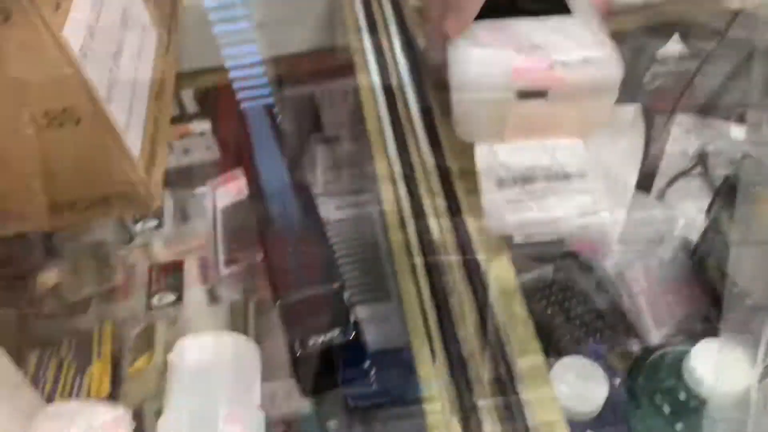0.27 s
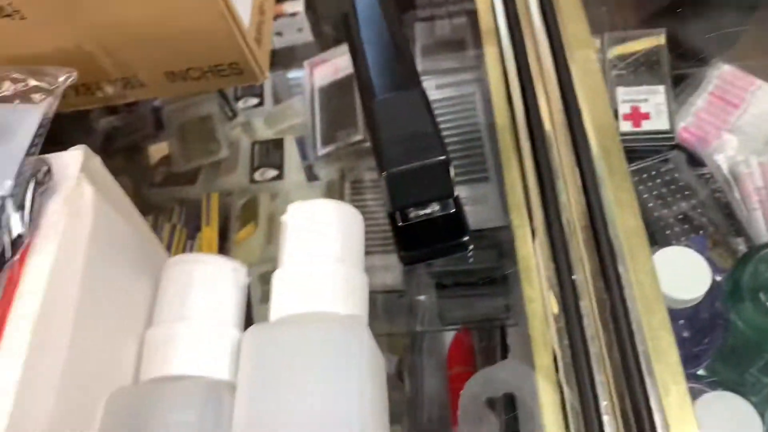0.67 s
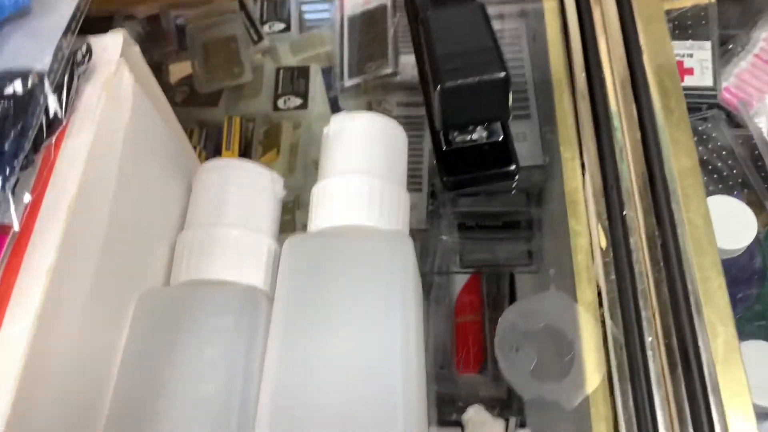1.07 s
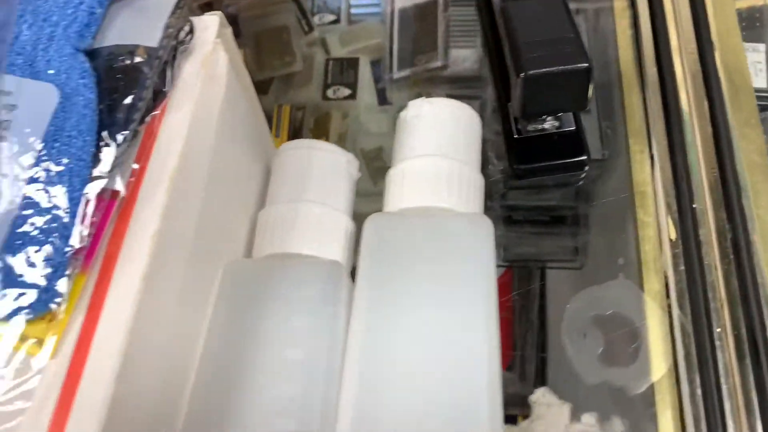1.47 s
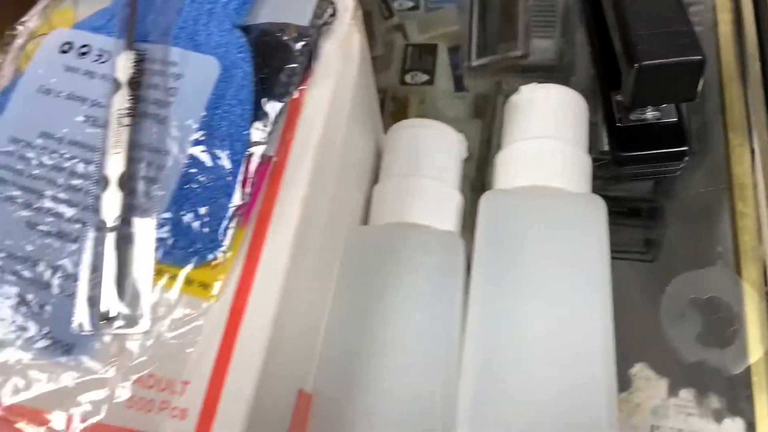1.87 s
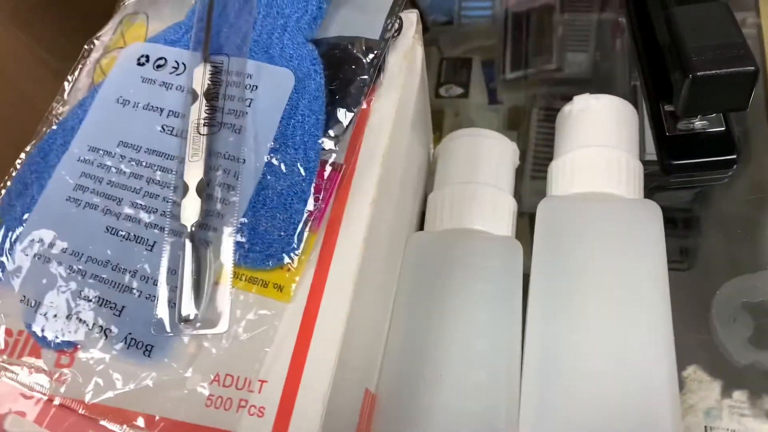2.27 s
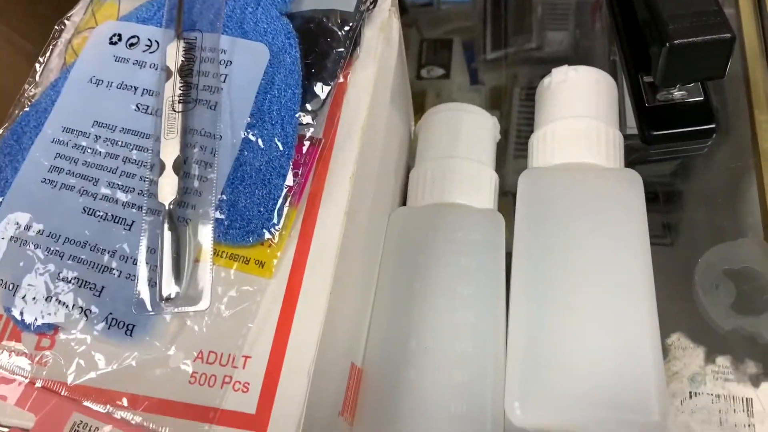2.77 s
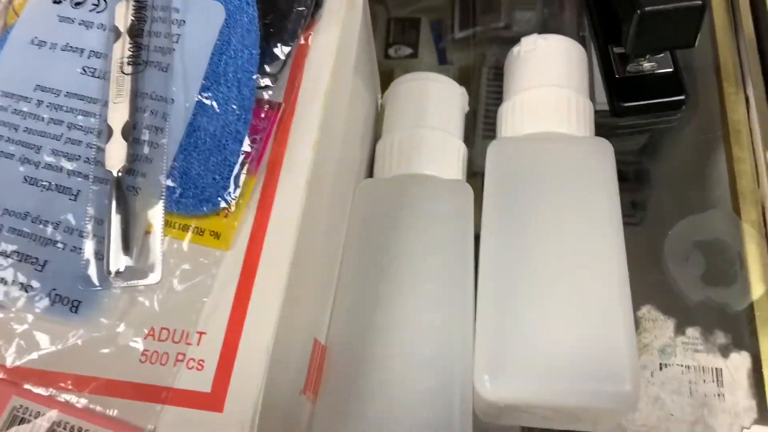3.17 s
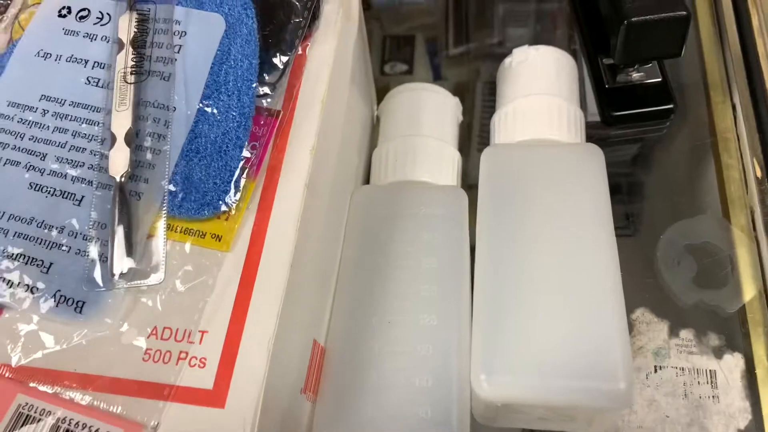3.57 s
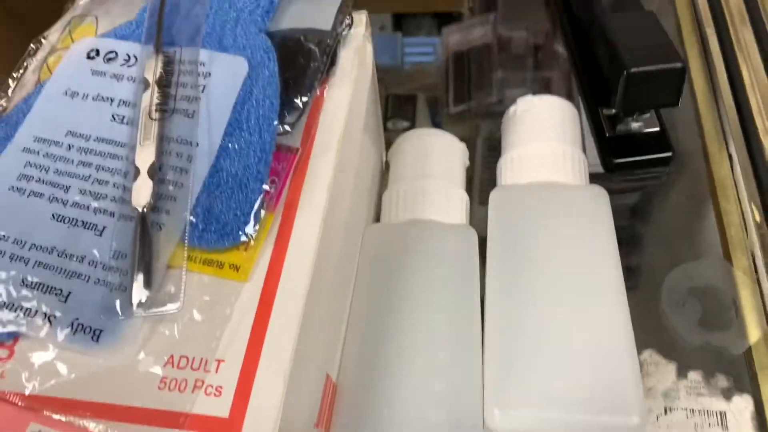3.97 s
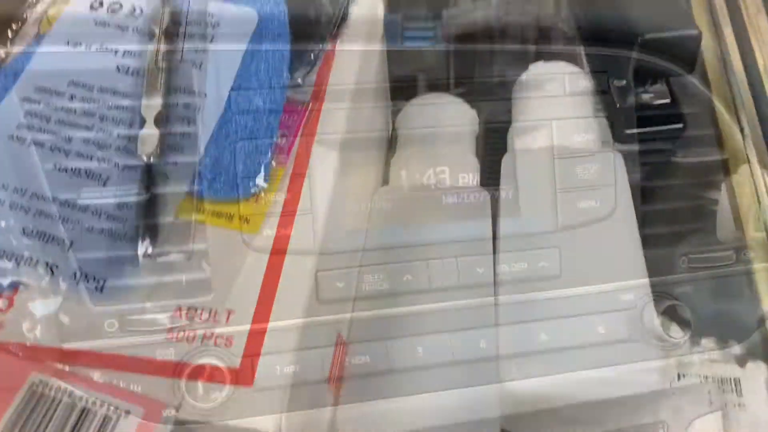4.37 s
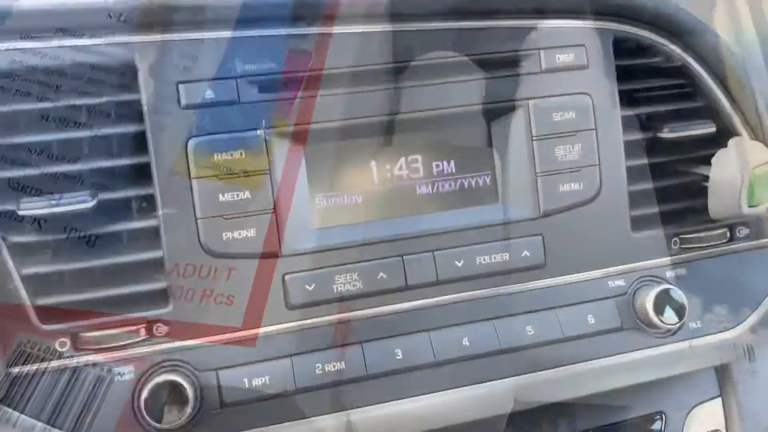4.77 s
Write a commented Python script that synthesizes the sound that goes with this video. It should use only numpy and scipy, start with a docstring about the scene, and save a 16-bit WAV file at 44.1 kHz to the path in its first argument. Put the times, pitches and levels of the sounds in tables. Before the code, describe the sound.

In a small shop with a low fan hum, plastic film crinkles and clicks near the microphone as packages are handled. One quick, squealing tear of tape stands out early on. After a lull with soft box knocks and a brief scrape, more crackling and sharp snaps follow, with a slight room echo. The handling dies down as the deep rumble inside a car comes in.

```python
"""Plastic film rustles, crumples and snaps as hands shift wrapped goods on a shop counter, off to the right.
Each tiny crease that gives way makes a burst of noise. Tape is torn off a carton, slipping faster and faster
in a rising squeal. Boxes knock and scuff, and the shop echoes briefly. A fan hums in the room; a busier
corner of the shop fades out at the start and the rumble of a car cabin fades in at the end."""
import sys
import numpy as np
from scipy import signal
from scipy.fft import rfft, irfft
from scipy.io import wavfile
from scipy.ndimage import uniform_filter1d

SR = 44100
rng = np.random.default_rng(int(sys.argv[2]) if len(sys.argv) > 2 else 0)


def wav_out(sig):
    """Save sig, one row per channel (or a flat mono array), as 16-bit PCM at SR to the path in sys.argv[1]."""
    wavfile.write(sys.argv[1], SR, np.round(np.clip(np.atleast_2d(sig).T, -1, 1) * 32767).astype(np.int16))


N = 220500
LAG_SAMPLES = 8  # sound from the right reaches the left microphone this much later


def film_rustle():
    """Film crackles crisply over a papery rustle and the dull rub of fingers and card."""
    # Each row: time in seconds, rustle level in dB, rubbing level in dB.
    handling = [(0.0, -75, -65.5), (0.2, -66, -52), (0.33, -60, -55.5), (0.48, -65, -60),
                (0.88, -66.5, -58.5), (1.05, -52.5, -53.5), (1.3, -52, -55.5), (1.5, -40, -56),
                (1.56, -58.5, -53), (1.68, -62, -60), (1.93, -65.5, -64.5), (2.11, -74.5, -69.5),
                (2.4, -78, -68), (2.54, -87.5, -86.5), (2.84, -85, -79.5), (2.93, -56, -52),
                (3.03, -53.5, -55.5), (3.22, -56.5, -67), (3.45, -62.5, -62), (3.62, -62, -61.5),
                (3.85, -74.5, -66.5), (3.944, -69.5, -68), (3.965, -60.5, -61.5), (4.02, -69, -61.5),
                (4.1, -77.5, -76.5), (4.25, -80, -80.5), (4.4, -78.5, -71), (4.56, -65, -65),
                (4.88, -72, -68), (5.0, -80, -75.5)]
    # The tone of each of the three layers. Each row: frequency in Hz, level in dB.
    crisp_tone = [(5500, -21), (7500, -5), (9500, 1.5), (12500, -2), (16000, -2.5)]
    papery_tone = [(1800, -14.5), (2800, -2), (4500, -3), (6800, 2), (8500, -13.5)]
    dull_tone = [(300, -1), (600, 1.5), (1200, -5), (2200, -2.5), (3500, -9.5), (6000, -8)]
    film_db, dull_db = curves(handling)
    crisp_db = -65 + 1.34 * (film_db + 65)  # firm handling is brighter
    crisp = rubbing(crisp_tone, alike=1, creases=(360, 1.4, 0.0038), smooth=1.5, flutter_db=2.2)
    papery = rubbing(papery_tone, alike=0.46, creases=(170, 2.1, 0.0048), smooth=1.1, flutter_db=1.1)
    dull = rubbing(dull_tone, alike=0.6, creases=(220, 2.0, 0.006), smooth=1.2, flutter_db=1.8)
    return crisp * undb(crisp_db) + papery * undb(film_db) + dull * undb(dull_db)


def film_crumples():
    """Handfuls of film crumple in bursts of dense crackle that swell and sink."""
    # Each row: middle in seconds, half length in seconds, level in dB, low cutoff in Hz.
    handfuls = [(0.901, 0.054, -45, 5000), (1.09, 0.051, -46, 6000), (1.184, 0.028, -37, 1200),
                (1.33, 0.032, -78, 4970), (1.905, 0.031, -46, 2540), (2.877, 0.022, -51.5, 2500),
                (2.944, 0.045, -37.5, 1940), (3.159, 0.14, -44, 4080), (3.431, 0.064, -45.5, 5270),
                (3.564, 0.02, -42, 1180), (3.957, 0.013, -35, 2200), (3.987, 0.064, -55, 1800),
                (4.629, 0.039, -57, 3006), (4.866, 0.096, -56, 4100)]
    tone = [(300, -3.5), (3000, -6.0), (16000, -4.0)]  # Each row: frequency in Hz, level in dB.
    crackle = rubbing(tone, alike=0.94, creases=(650, 1.7, 0.0031), smooth=0.89, flutter_db=0.99)
    out = np.zeros((2, N))
    for middle, half, db, cutoff_hz in handfuls:
        at = np.arange(int((middle - half) * SR), int((middle + half) * SR))
        swell = undb(db) * np.cos(np.pi / 2 * (at / SR - middle) / half) ** 2
        out[:, at] += swell * filtered(crackle[:, at], cutoff_hz, "high")
    return out


def film_snaps():
    """A crease snaps in a ragged burst; heavier ones fill the lower ranges, which ring longer."""
    # Each row: start in seconds, treble level in dB, weight (middle against treble) in dB,
    # body (bass against treble) in dB, length as a multiple of the usual ring.
    creases = [(0.227, -45, -1, 6, .9), (0.2458, -39, 5.5, 2.5, .8), (0.4, -34, -3.5, -12, 1.1),
               (0.463, -37.5, -2.5, -13, .9), (0.615, -29.5, -6.5, -26, .7), (0.6407, -43, 2, -20, .9),
               (0.6471, -37, 7.5, -1.5, .7), (0.6885, -44, -10, -24, 1.8), (0.7455, -41, -5.5, -21, .9),
               (0.77, -42, -4, -6.5, .9), (0.8659, -32.5, -13, -18, .9), (0.9476, -30, -13, -21, 1.6),
               (0.9924, -39.5, -7, -5, .9), (1.1723, -9.5, -20.5, -22.5, .75), (1.253, -32, -7, -13.5, .9),
               (1.296, -29.5, -22, -13.5, .9), (1.362, -41, -5, -4, .9), (1.3784, -38, -11, -25, .9),
               (1.391, -18.5, -10, -16, .7), (1.8923, -23.5, -14.5, -22, 1.3), (2.192, -58, 15.5, 14.5, .9),
               (2.206, -63, 16, 20, .9), (2.825, -51.5, -9, -17.5, .9), (2.8697, -42, -5, -14.5, .9),
               (2.906, -35, -18, -20, .9), (2.917, -48, -1, -4, .9), (2.9238, -34, -1.5, -17, .9),
               (2.9315, -20, -13.5, -27, 1.7), (2.941, -42, -19, -9, .9), (2.984, -35.5, -6.5, -12, 1.3),
               (3.006, -46.5, 3, -6, .9), (3.106, -41, -2.5, -9, 1.6), (3.129, -49, -2, -11, .7),
               (3.1604, -13.5, -25.5, -32.5, .9), (3.1848, -29, -11.5, -19.5, 1.4),
               (3.238, -33, -16, -19, .9), (3.549, -39.5, -6, -15, .9), (3.565, -34.5, -6.5, -13, 1.4),
               (3.573, -24.5, -12, -26.5, .8), (3.9495, -34.5, -8, -19, 1.3), (3.9555, -26, -7.5, -20, .9),
               (4.514, -57, 4, 2, 1.2), (4.577, -48, -15, -20, 1.1), (4.589, -40, -12, -9, .9),
               (4.669, -37, -10.5, -15, 1.8), (4.806, -37.5, -15.5, -14, .9)]
    # Each row: low and high edge in Hz, likeness of the microphones from 0 to 1, level offset in dB,
    # share of the weight, share of the body, seconds to fade by 60 dB, boost of the first crack in dB.
    ranges = [(7500, 15460, 0.98, 3.5, 0.14, 0.13, 0.017, 6.5),
              (4200, 9730, 0.9, 3.5, 0.48, 0.12, 0.028, 2), (1320, 4700, 0.59, 1.5, 0.93, 0.094, 0.038, 2),
              (280, 1300, 1, -1.5, 0.0095, 1, 0.062, -0.4)]
    rise_s, crack_s = 0.0015, 0.0009
    soft_db, hard_db = -42.5, -26.5  # weak creases give way without a crack, strong ones crack fully
    t = np.arange(SR // 12) / SR
    rise = np.minimum(t / rise_s, 1) ** 4
    crack = np.exp(-np.maximum(t - rise_s, 0) / crack_s)
    ragged = grains(per_s=1500, spread_db=2.5, grain_s=0.0005) + 0.9
    noise = rng.standard_normal((3, N))
    out = np.zeros((2, N))
    for low_hz, high_hz, alike, range_db, weight_share, body_share, ring_s, crack_db in ranges:
        crackle = band(two_microphones(noise[0], noise[1:], alike) * ragged, low_hz, high_hz)
        for start, db, weight_db, body_db, length in creases:
            hardness = np.clip((db - soft_db) / (hard_db - soft_db), 0, 1)
            fade_db = 60 * t / max(ring_s * length, 0.004)
            shape = rise * undb(crack_db * crack * hardness / length ** 2 - fade_db)
            at = slice(int(start * SR), int(start * SR) + len(t))
            # the crease's stored energy, not chance, sets how loud it is
            burst = unit(crackle[:, at] * shape) * np.sqrt(np.mean(shape ** 2))
            out[:, at] += burst * undb(db + range_db + weight_share * weight_db + body_share * body_db)
    return out


def tape_tear():
    """Glue lets go in quick slips: each puffs out hiss, and their rate is the pitch of the squeal."""
    # Each row: time in seconds, hiss level in dB, squeal level in dB, slips per second.
    pull = [(1.396, -23, -34.5, 559.8), (1.412, -21.5, -36, 503.5), (1.43, -21, -38, 468.4),
            (1.445, -19.5, -34.5, 506), (1.455, -20.5, -35, 550.4), (1.468, -19, -28.5, 609.6),
            (1.478, -18.5, -24, 640), (1.487, -13.5, -23, 625), (1.495, -12, -21, 644)]
    # The tone of the hiss. Each row: frequency in Hz, level in dB.
    hiss_tone = [(200, -16.5), (350, -5.5), (700, -6), (1300, -12), (2000, -13), (2500, -14.5), (3100, -14),
                 (3700, -13), (4500, -8), (7000, -1.5), (10000, -3.5), (13000, -5), (16000, -6)]
    # The taut tape rings. Each row: pitch in Hz, width in Hz, level against the hiss in dB.
    tape_rings = [(4132, 300, -18), (6030, 170, -18.5), (6820, 260, -17.5)]
    # Levels in dB at 1, 2, 3 and 4 times the slip rate.
    harmonics_db = [0, -8, -13, -12]
    start_s, let_go_s, attack_s = 1.396, 1.4859, 0.013
    held = undb(plateau(start_s + attack_s, let_go_s, rise_db_per_s=25.5 / attack_s, fall_db_per_s=2200.5))
    held *= np.arange(N) / SR > start_s
    hiss_db, squeal_db, slip_hz = curves(pull)
    phase = 2 * np.pi * np.cumsum(slip_hz * (1 + 0.03 * wander(200))) / SR
    hiss = rubbing(hiss_tone, alike=0.97, creases=(530, 1.2, 0.0018), smooth=3, flutter_db=0.6, patchy_db=3)
    hiss += sum(undb(db) * unit(resonance(hiss, hz, width)) for hz, width, db in tape_rings)
    puffs = 1 + 0.32 * np.cos(phase)
    squeal = sum(undb(db) * np.sin(k * phase) for k, db in enumerate(harmonics_db, start=1))
    squeal *= held * undb(squeal_db + 1.3 * wander(200))
    squeal *= undb(plateau(0, let_go_s, 0, fall_db_per_s=5000))  # the squeal stops before the hiss
    squeal += undb(-1.5) * resonance(squeal, hz=640, width_hz=330)  # the carton rings along
    left = undb(-3.5) * np.roll(squeal, LAG_SAMPLES)  # the carton faces the right microphone
    return held * hiss * puffs * undb(hiss_db) + np.array([left, squeal])


def knocks_and_ticks():
    """Low thuds of boxes and sharp ticks of snapping film: each a short note with two weaker overtones."""
    # Each row: start in seconds, level in dB, pitch in Hz, seconds to fade by 60 dB.
    notes = [(0.263, -28, 106, 0.064), (0.6479, -21.5, 4330, 0.0032), (0.6474, -23.5, 1900, 0.0045),
             (.777, -24, 570, 0.0042), (0.995, -35, 1380, 0.013), (1.392, -32, 562, 0.041),
             (2.194, -45.5, 2190, 0.013), (2.198, -25, 94, 0.14), (2.203, -36, 150, 0.028),
             (2.202, -38.5, 560, 0.026), (2.2092, -34, 1410, 0.016), (2.217, -53, 1480, 0.0077),
             (2.238, -48.5, 804, 0.015), (2.269, -30.5, 1480, 0.0033), (2.2735, -35.5, 122.5, 0.084),
             (2.47, -40.5, 1236, 0.023), (2.93, -34.5, 650, 0.013), (2.968, -39, 1640, .01),
             (2.985, -40, 1600, .01), (2.987, -39, 696, 0.018), (3.009, -49, 900, .015),
             (3.161, -39, 1240, 0.01), (3.162, -40.5, 3000, 0.011), (3.2385, -47, 1500, 0.015),
             (3.2395, -43.5, 744, 0.014), (3.82, -54, 1300, 0.012), (3.915, -54, 1200, .012),
             (4.588, -21, 772, 0.0066)]
    loss_db_per_hz = 0.004  # higher notes have weaker overtones
    t = np.arange(SR // 4) / SR
    out = np.zeros(N + SR)
    for start, db, hz, ring_s in notes:
        rise = np.minimum(t * hz / 0.95, 1)
        for ratio, offset_db in [(1, 2), (1.8, -2), (2.7, -5)]:
            level_db = db + offset_db - loss_db_per_hz * hz * (ratio - 1)
            ring = undb(level_db - 60 * t * ratio / ring_s) * np.sin(2 * np.pi * hz * ratio * t)
            out[int(start * SR):][:len(t)] += rise * ring
    return np.array([out[:N], out[:N]])


def box_scuff():
    """Card dragged over glass makes grainy noise, coloured by the ringing of the box."""
    # Each row: start in seconds, length in seconds, level in dB.
    strokes = [(2.434, 0.033, -56.5), (2.469, 0.02, -43.5)]
    # The tone of the box. Each row: frequency in Hz, level in dB.
    box_tone = [(250, -2), (600, 1), (900, -6.5), (1250, -3), (1800, -10.5), (3100, -12.5), (6000, -26.5),
                (15000, -9.5)]
    drag = rng.standard_normal(N) * (grains(per_s=327, spread_db=1.7, grain_s=0.0071) + 1.04)
    level = sum(undb(db + plateau(start, start + length, rise_db_per_s=4000, fall_db_per_s=1300))
                for start, length, db in strokes)
    return level * colour(two_microphones(drag, np.zeros(N), alike=1), box_tone)


def shop_echo(sound):
    """The walls answer with a short tail, different at each microphone; its treble dies first."""
    ring_s, treble_ring_s, split_hz, echo_db = 0.27, 0.19, 5740, -13
    t = np.arange(SR // 2) / SR
    bounces = rng.standard_normal((2, len(t))) * np.minimum(t / 0.0033, 1)
    middle = band(bounces * undb(-60 * t / ring_s), 760, split_hz)
    treble = band(bounces * undb(-7 - 60 * t / treble_ring_s), split_hz, 21000)
    tail = band(middle, 470, 14000) + treble
    tail /= np.sqrt(np.sum(tail ** 2) / 2)
    return undb(echo_db) * signal.fftconvolve(sound[1:], tail, axes=1)[:, :N]


def fan_and_room():
    """A fan hums with a slight waver over the low, restless noise of the room."""
    # The tone of the room. Each row: frequency in Hz, level in dB.
    room_tone = [(15, -61), (25, -37.5), (43, -13.5), (59, 2), (80, -5.5), (99, -9), (190, -16),
                 (229, -17.5), (277, -23.5), (317, -20.5), (439, -37), (900, -49), (2000, -52), (4000, -53),
                 (6500, -54), (10000, -57), (13000, -65), (16000, -77.5)]
    hum_hz = 75.3 * (1 + 0.025 * wander(7.5))
    hum = np.sin(2 * np.pi * np.cumsum(hum_hz) / SR) * undb(-53.5 + wander(6.9))
    return hum + all_round_noise(room_tone, split_hz=440) * undb(-55.5 + 3.2 * wander(10))


def busy_corner():
    """The noise of a busier corner, with a few ringing pitches in it, fades out."""
    # Each row: frequency in Hz, level in dB.
    tone = [(60, 4.5), (110, 10.5), (280, -8.5), (700, -15), (1100, -15), (1900, -29.5), (2350, -17),
            (2800, -22), (6000, -28.5), (9000, -46)]
    # Each row: pitch in Hz, width in Hz, level against the noise in dB.
    rings = [(272, 33, -7), (2268, 80, -15), (2320, 100, -17.5), (2472, 100, -15.5)]
    # Each row: time in seconds, level in dB.
    fade = [(0, -45), (.12, -50.5), (.25, -54), (.45, -64), (.6, -114)]
    ringing = sum(undb(db) * unit(resonance(rng.standard_normal(N), hz, width)) for hz, width, db in rings)
    return (all_round_noise(tone, split_hz=400) + ringing) * undb(curves(fade)[0])


def car_cabin():
    """The deep rumble inside a car fades in."""
    # Each row: frequency in Hz, level in dB.
    tone = [(15, -34.5), (25, -3), (48, 0), (108, -3.5), (213, -14.5), (331, -19.5), (592, -30), (753, -31),
            (1680, -52.5), (3000, -47), (3900, -88.5), (6600, -120)]
    # Each row: time in seconds, level in dB.
    fade = [(4.1, -72), (4.3, -57.5), (4.6, -47), (5, -43.5)]
    return all_round_noise(tone, split_hz=440) * undb(curves(fade)[0])


def rubbing(tone, alike, creases, smooth, flutter_db, patchy_db=5.0):
    """Grainy noise that flutters with the fingers; creases holds the three settings of grains()."""
    noise = rng.standard_normal((3, N))
    roughness = (grains(*creases) + smooth) * undb(flutter_db * wander(35))
    near = folds(noise[0], patchy_db)
    return colour(two_microphones(near, noise[1:], alike) * roughness, tone)


def grains(per_s, spread_db, grain_s):
    """The loudness of many tiny creases giving way, mostly small and a few large."""
    chance = rng.random(N) * SR / per_s
    starts = (chance < 1) * undb(-2 * spread_db * np.log(np.clip(chance, 5e-3, 1)))
    energy = signal.lfilter([1], [1, -np.exp(-2 / (grain_s * SR))], starts)
    return unit(np.sqrt(energy + 1e-9))


def folds(x, spread_db, length_s=0.046, width_hz=450):
    """Folds come and go, each ringing in its own way: random gains in patches of time and pitch."""
    spectrum = signal.stft(x, nperseg=256)[2]
    patches = uniform_filter1d(rng.standard_normal(spectrum.shape), int(width_hz * 256 / SR), axis=0)
    patches = uniform_filter1d(patches, int(length_s * SR / 128), axis=1)
    return signal.istft(spectrum * undb(spread_db * unit(patches)), nperseg=256)[1][:N]


def two_microphones(near, scattered, alike):
    """The left one hears the near sound late; each also hears its own duller, scattered share."""
    direct = np.array([np.roll(near, LAG_SAMPLES), near])
    return np.sqrt(alike) * direct + np.sqrt(1 - alike) * filtered(scattered, 9500, "low")


def all_round_noise(tone, split_hz):
    """Noise from all round: the same at both microphones in the bass, unrelated in the treble."""
    middle, side = rng.standard_normal((2, N))
    side = filtered(side, split_hz, "high", order=1)
    return colour(np.array([middle + side, middle - side]), tone)


def colour(x, tone):
    """Shapes x by rows of Hz and dB, falling 18 dB an octave beyond them; average strength 1."""
    hz, db = np.transpose(tone)
    f = np.maximum(np.arange(N // 2 + 1) * SR / N, 1)
    octaves_outside = np.maximum(np.log2(hz[0] / f), 0) + np.maximum(np.log2(f / hz[-1]), 0)
    gain_db = np.interp(np.log(f), np.log(hz), db) - 18 * octaves_outside
    return unit(irfft(rfft(x) * undb(gain_db), N))


def wander(per_s):
    """A smooth random drift, about 1 either side of zero."""
    hold = int(SR / per_s)
    steps = np.repeat(rng.standard_normal(N // hold + 1), hold)
    return 1.6 * uniform_filter1d(uniform_filter1d(steps, hold), hold)[:N]


def plateau(start_s, end_s, rise_db_per_s, fall_db_per_s):
    """A level in dB that reaches 0 at the start, holds, and falls after the end."""
    t = np.arange(N) / SR
    return np.minimum(rise_db_per_s * (t - start_s), 0) - np.maximum(fall_db_per_s * (t - end_s), 0)


def curves(table):
    """Each column after the time, drawn through all samples."""
    times, *columns = np.transpose(table)
    return [np.interp(np.arange(N) / SR, times, column) for column in columns]


def filtered(x, hz, kind, order=2):
    return signal.sosfilt(signal.butter(order, hz, kind, fs=SR, output="sos"), x)


def band(x, low_hz, high_hz):
    return filtered(x, [low_hz, high_hz], "band")


def resonance(x, hz, width_hz):
    return band(x, hz - width_hz / 2, hz + width_hz / 2)


def undb(db):
    return 10 ** (np.asarray(db) / 20)


def unit(x):
    return x / np.sqrt(np.mean(x ** 2))


def scene():
    """The sounds at the counter, their echo and the background reach a phone's two microphones."""
    knocks = knocks_and_ticks()
    hands = film_rustle() + film_crumples() + film_snaps() + tape_tear() + box_scuff()
    echo = shop_echo(hands + undb(-4.5) * knocks)  # knocks and ticks echo less than the rest
    near = hands + knocks
    near[0] -= undb(-5) * band(near[0], 3800, 7500)  # the phone's body shades the left microphone
    return near + echo + fan_and_room() + busy_corner() + car_cabin()


def record(dry):
    """The phone thins the deep bass, drops the highest treble, then cuts it off."""
    top_hz, cut_hz = 15800, 16700
    thin = filtered(dry, 30, "high")
    soft = signal.sosfilt(signal.ellip(5, 0.3, 30, top_hz, fs=SR, output="sos"), thin)
    return signal.sosfilt(signal.ellip(10, 0.2, 75, cut_hz, fs=SR, output="sos"), soft)


dry = scene()
out = record(dry)
wav_out(out)
```